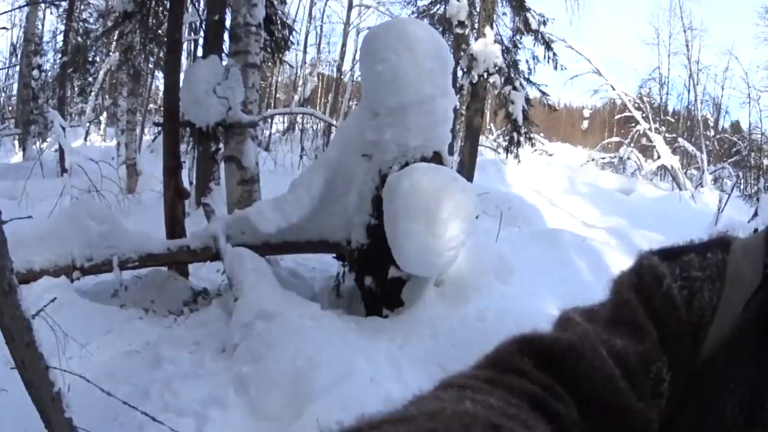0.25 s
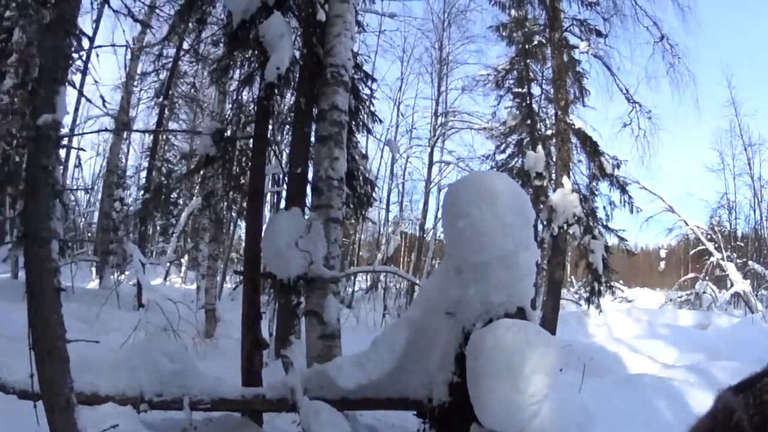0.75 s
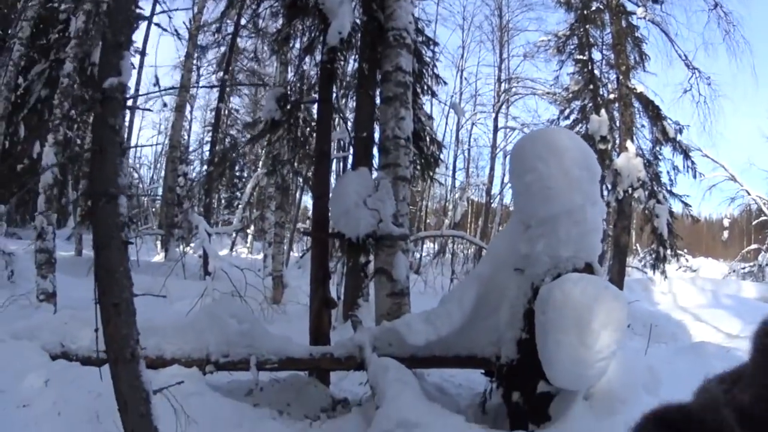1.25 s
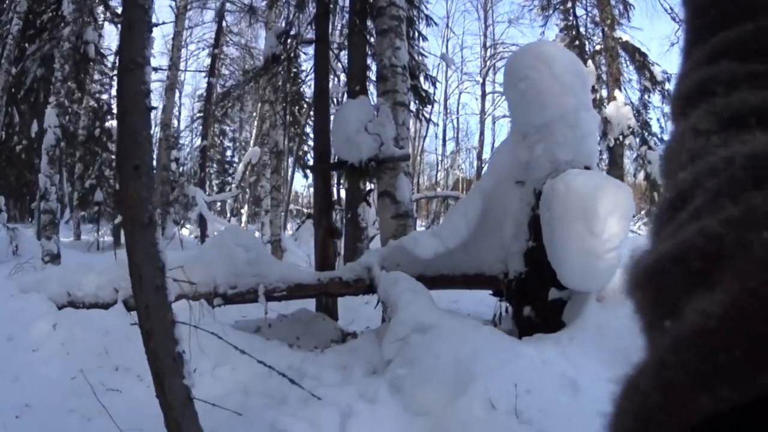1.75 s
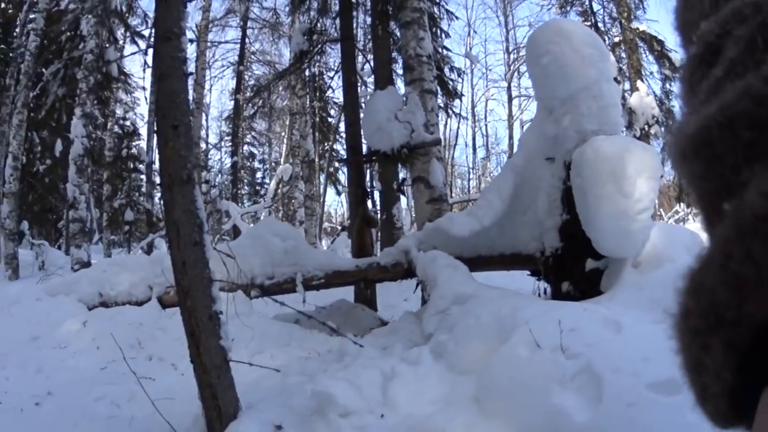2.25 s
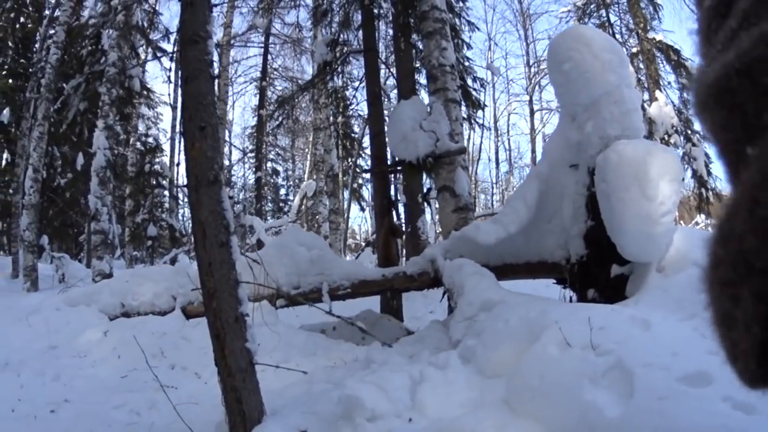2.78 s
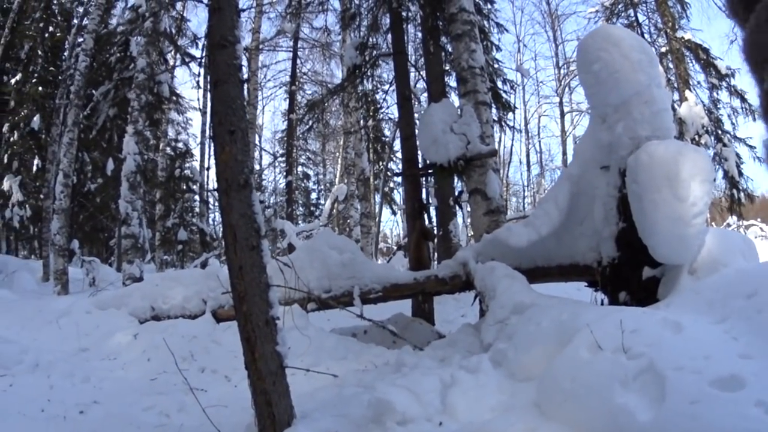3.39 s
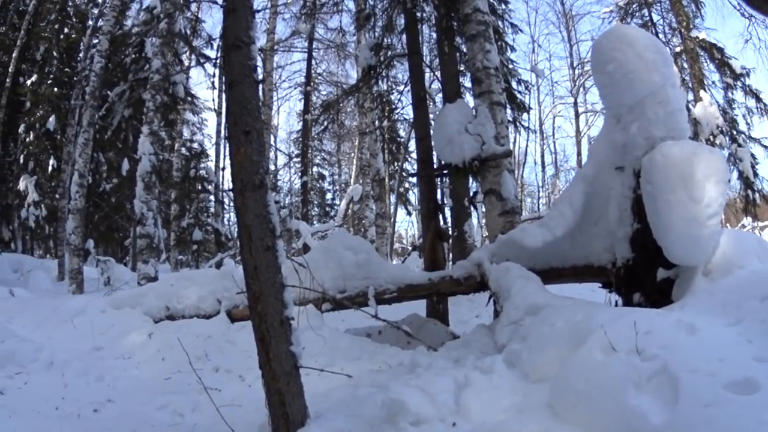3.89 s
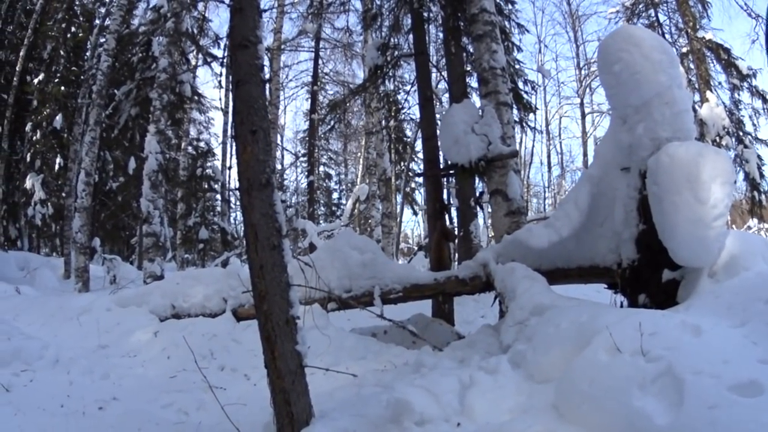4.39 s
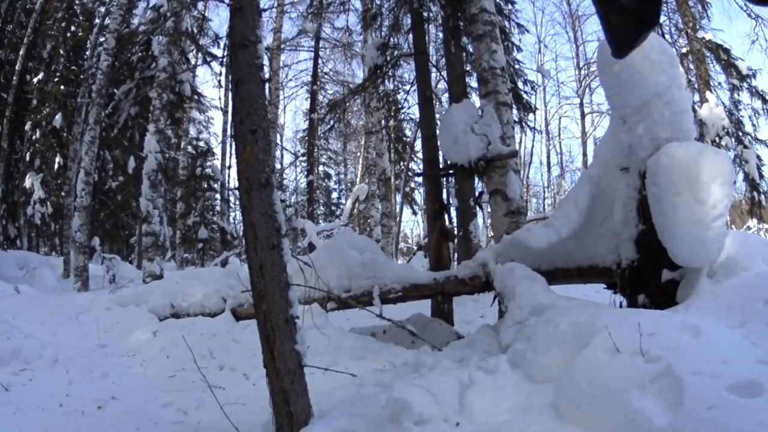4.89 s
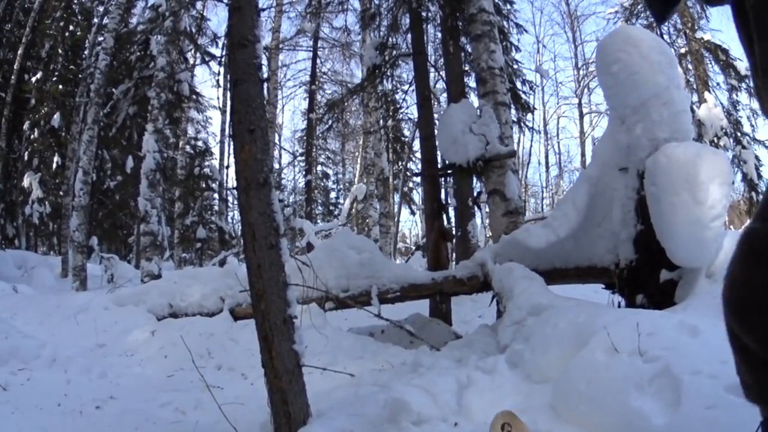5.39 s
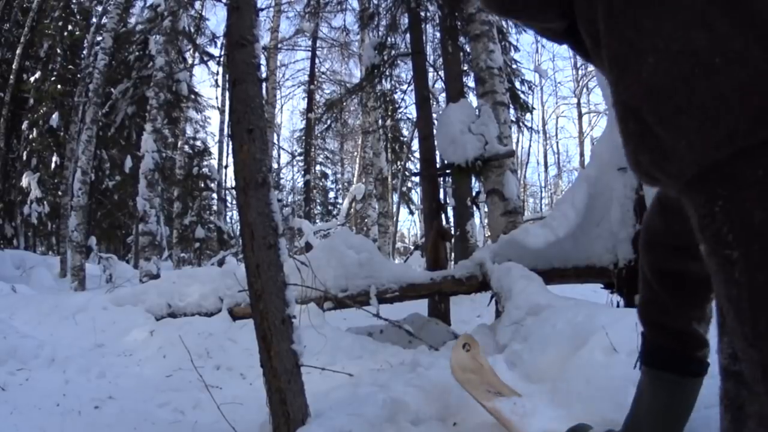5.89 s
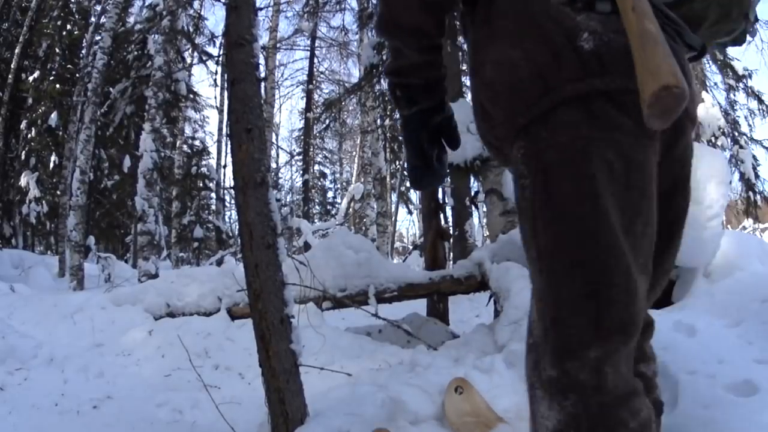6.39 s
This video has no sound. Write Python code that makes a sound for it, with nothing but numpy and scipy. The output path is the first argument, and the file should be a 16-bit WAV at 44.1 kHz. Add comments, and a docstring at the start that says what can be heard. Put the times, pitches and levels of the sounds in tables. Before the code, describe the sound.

Close, dry camera sound in a hushed snowy forest. Thuddy handling knocks come first, followed by faint hollow rubs and thin fibre hiss, fading into near silence. Then a skier shifts weight: a soft swish, accelerating dull creaks, bursts of coarse crunching, hoarse short squeaks, a glide, and a hard step-off with bright cracks and a scrape. The skis start slightly right and finish almost in front.

```python
"""Glove on a camera, skis on frozen snow

A gloved hand sets a small camera down in a still winter forest: filtered slip bursts bump the case, noise strokes rub it.
Close by, a skier shifts his weight and steps off on wide wooden skis. Grain noise shaped by pushes makes the
frozen snow crackle; bursts add creaks, crunches, squeaks and a ringing scrape; smooth noise makes the swishes.
There are no echoes."""
import sys
import numpy as np
from scipy import signal
from scipy.fft import rfft, irfft
from scipy.io import wavfile
from scipy.ndimage import uniform_filter1d

SR = 44100
rng = np.random.default_rng(int(sys.argv[2]) if len(sys.argv) > 2 else 0)


def digitize_waveform(pressure):
    """Quantize a signal to 16-bit integers and store it at the path in sys.argv[1].

    Rows of a 2-D input are taken as channels; values are limited to [-1, 1].
    """
    field = np.atleast_2d(pressure).T
    bounded = np.clip(field, -1, 1)
    quanta = np.round(bounded * 32767).astype(np.int16)
    wavfile.write(sys.argv[1], SR, quanta)


N = 293265
TIME_S = np.arange(N) / SR
FREQS_HZ = np.maximum(np.fft.rfftfreq(N, 1 / SR), 1)

# air and microphone hiss spectrum: f/Hz, level/dB
FOREST_SPECTRUM = [(24, -62), (40, -40.5), (262, -3), (356, -2.5), (640, -2.5), (829, -1), (1130, -3),
                   (2560, -7), (4100, -10), (11000, -14), (14300, -56.5), (22000, -120)]
FOREST_DB = -68.5
# difference of the two microphone ports relative to their sum: f/Hz, level/dB
CASE_SIDE = [(60, -9), (190, 0), (600, 7.5), (1100, 4.5), (2000, 3), (3600, -0.5), (6500, -5), (11000, -8)]
AIR_SIDE = [(60, -2.5), (400, 1.5), (1100, 0), (2200, 5), (3600, -1.5), (5500, -10), (11000, -3)]
SKI_SIDE = [(60, -12), (300, -11), (700, -6.5), (1200, -6), (3600, -13.5), (6500, -16.5), (11000, -12.5)]
# ski position: t/s, left minus right/dB
SKI_PAN = [(3.6, -3), (4.2, -1.6), (4.7, -1.3), (5.2, -0.6), (5.7, -3), (6.3, -0.12)]
TOP_HZ = 11100

# glove bumping and scuffing the case: middle t/s, length/s, level/dB, tilt/(dB per octave)
BUMPS = [(0.039, 0.012, -47.5, 7), (0.067, 0.014, -54, 3), (0.1, 0.047, -53.5, 12), (0.124, .022, -19.5, 3),
         (0.139, 0.0059, -25, -10), (.2, 0.038, -34.5, -3), (0.23, 0.059, -23.5, 0.5),
         (.276, 0.0035, -28, -11), (.322, .03, -56, 10), (0.345, .022, -19.5, 1), (0.36, 0.0089, -30, .5),
         (.414, 0.0062, -43, 6), (0.429, 0.054, -39.5, -13), (0.482, 0.074, -37, -3.5),
         (0.533, 0.044, -52, -7), (0.604, 0.029, -34, -0.5), (0.644, 0.0049, -47.5, -4),
         (0.737, 0.0061, -22, -4), (0.747, .03, -20, 0), (0.852, .011, -31.5, -10),
         (0.863, 0.0044, -30, 18), (0.882, 0.033, -23.5, -3), (0.891, 0.0038, -21, 6.5),
         (1.134, 0.0045, -41, 9), (1.181, 0.017, -45, -2), (1.468, 0.0053, -50, 6), (1.523, .012, -51.5, 9),
         (1.647, .008, -59.5, 4), (1.791, 0.012, -44.5, 4.5), (1.809, 0.0051, -43.5, 4),
         (1.833, 0.013, -47.5, 2), (2.184, 0.012, -47.5, 12.5), (2.457, .017, -49, 2),
         (2.908, 0.039, -54.5, 2), (3.037, 0.0056, -54.5, 6.5), (3.254, 0.016, -49, 3),
         (3.3, 0.0059, -42, 3), (3.653, .006, -46.5, 7)]
# case spectrum under a bump: f/Hz, level/dB
CASE_SPECTRUM = [(18, -38), (30, -14.5), (75, -4.5), (216, -2), (454, -1.5), (709, -2.5), (782, 1.5),
                 (953, -5.5), (1310, -8.5), (2320, -17), (2760, -22), (4990, -32.5), (5650, -34.5),
                 (11000, -49), (14300, -71.5), (22000, -120)]
# glove strokes along the case: start t/s, end t/s, level/dB, swell over stroke/dB, pressure/(0-1), fibre hiss f/Hz
DRAGS = [(0.9, 0.939, -45.5, -15.5, 0.44, 5700), (.944, 0.964, -61.5, -2.5, 0, 7504),
         (1.005, 1.055, -60.5, 5.5, 0.35, 7000), (1.11, 1.19, -62, 1, 0.36, 5627),
         (1.227, 1.304, -65.5, 6, 0.41, 5567), (1.328, 1.471, -62.5, 9.5, .28, 5550),
         (1.496, 1.529, -59, 13.5, 0.24, 5550), (1.61, 1.643, -68, 9, 0.1, 5550),
         (1.69, 1.781, -65, 2, 0.58, 5500), (1.787, 1.996, -60.5, -2, 0.75, 5440),
         (2.014, 2.458, -53, 1.5, 0.77, 5460), (2.512, 2.578, -51, 6, 0.82, 5400),
         (2.662, 2.851, -49, 5, 0.83, 5390), (2.97, 3.046, -72, 7, 0.28, 5387)]
# rubbed case spectrum: f/Hz, level/dB
RUB_SPECTRUM = [(47, -63), (80, -30), (268, -24), (456, -4), (614, -8), (775, 0.5), (1170, -6),
                (1270, -3.5), (1380, -13), (1610, -9), (1800, -15.5), (2640, -9.5), (3390, -27.5),
                (4200, -26.5), (5460, -31), (9240, -120)]
# broad skirt of the fibre hiss: f/Hz, level/dB
FIBRE_SPECTRUM = [(2000, -22.5), (4300, -4.5), (5350, 5.5), (6300, -7.5), (7200, -5), (8200, -14.5),
                  (11000, -23.5)]
DRAG_ATTACK_S, DRAG_RELEASE_S = 0.011, 0.006
# relative to the rasp at (lightest touch, full pressure): pressure wakes the shell, flattens the fibres
HOLLOW_DB, FIBRE_DB = (-10, 7), (11, -12)
WOOL_FLUTTER_DB = 1.5
GRIP_REST_DB, GRIP_RUB_DB = -66.5, -30  # resting level; rub relative to its bump
GRIP_TIGHTEN_S, GRIP_RELAX_S = 0.007, 0.01  # time constants

# skier's swishes: middle t/s, length/s, hiss level/dB, hollow body level/dB
SWISHES = [(3.572, 0.32, -54, -59), (5.514, 0.38, -44.5, -64), (5.647, 0.16, -43.5, -61.5)]
# ski pushes: start t/s, build-up/s, time to ease by 20 dB/s, crust level/dB, weight/(0-1), powder re crust/dB
PUSHES = [(3.672, 0.1, .27, -60, 0.73, -15), (3.89, 0.068, 0.38, -56.5, 0.7, -14),
          (4.03, 0.061, 0.27, -57.5, 0.9, -13), (4.146, .015, 0.08, -43, .8, -8),
          (4.407, 0.066, 0.11, -33.5, 0.78, -12.5), (4.501, 0.1, .12, -38, 0.57, -8),
          (4.795, 0.024, 0.05, -31, 0.66, -3), (4.848, 0.054, 0.07, -41.5, 0.74, -8.5),
          (4.982, 0.14, 0.12, -34, 0.9, -5.5), (5.124, 0.078, 0.0633, -33, 0.85, -6.5),
          (5.278, 0.034, 0.1, -33, 0.74, -0.5), (5.42, 0.24, 0.4232, -48.5, 0.59, -9),
          (5.828, .13, 0.54, -42.5, .45, -8), (5.938, 0.0085, 0.24, -38.5, 0.73, -1),
          (5.981, .06, .5, -39, 0.68, -20), (6.146, 0.079, 0.6, -30.5, 0.52, -8.5),
          (6.279, 0.019, 0.1642, -20.5, .12, 0), (6.337, 0.026, 0.1849, -22.5, 0.31, -5.5),
          (6.43, 0.22, 8, -35.5, 0.36, -3)]
BITE_DB, BITE_S = -14, 0.0029  # onset level relative to the peak; onset ramp
STIR_DB, STIR_S, SETTLE_S = -21.5, 0.015, 0.03  # crumbs around the bite: level re peak, rise and fall time constants
# breaking snow spectrum: f/Hz, level/dB
SNOW_SPECTRUM = [(40, -64), (80, -24.5), (146, -20.5), (250, -15), (309, -10.5), (556, -3.5), (849, -5),
                 (1150, -2), (1270, -2), (2330, -1), (2560, -3.5), (2950, -3.5), (3480, -6.5),
                 (6410, -10.5), (11000, -22.5), (14300, -73), (22000, -120)]
# finer crust shaved by a gliding ski, applied to the snow spectrum: f/Hz, level/dB
GLIDE_SPECTRUM = [(1200, -5), (2000, -4), (3000, 1), (5500, 1.5)]
PACKING_DB = (-19.5, 3.5)  # relative to the crust at (unweighted ski, full weight)
SNOW_LOW_HZ = 55.4  # high-pass
AVALANCHE_SHARE = 0.69  # share of breaking power in avalanches under full weight
LURCH_DB, LURCH_PER_S = 1.3, 70  # uneven sinking: level spread under full weight, rate

# slabs giving way: middle t/s, length/s, level/dB, tilt/(dB per octave)
CRUNCHES = [(4.159, .016, -28.5, -4), (4.181, 0.0086, -31.5, -2.5), (4.194, 0.011, -36, -2.5),
            (4.212, .012, -50, -2), (4.517, .005, -24.5, 1), (4.555, 0.013, -23.5, -0.5),
            (4.595, .008, -28.5, -2), (4.608, .0036, -31, -5), (4.645, 0.0037, -30.5, -1),
            (4.71, 0.0015, -42.5, -3.5), (4.803, .005, -25, 12), (4.814, 0.0044, -25.5, 6.5),
            (4.821, 0.0055, -26, 8.5), (4.863, .004, -34, -3), (4.983, 0.0066, -35.5, -2.5),
            (5.008, 0.0069, -34, -5), (5.031, 0.0025, -23, -4.5), (5.058, 0.0059, -46, 7),
            (5.105, 0.029, -27.5, 0), (5.132, 0.0086, -27, 1), (5.227, 0.016, -25, -1.5),
            (5.311, 0.0018, -18.5, 6), (5.394, 0.011, -37, -5.5), (5.426, 0.0045, -36.5, 2),
            (5.953, 0.015, -28, -6.5), (6.036, 0.016, -30.5, -1), (6.21, 0.0038, -19.5, 0.5),
            (6.281, 0.0035, -23, 4.5), (6.29, 0.0022, -12, 9), (6.298, 0.006, -17.5, 3),
            (6.31, 0.0045, -26, 1), (6.357, 0.0016, -23, 12), (6.362, 0.0019, -29, 0),
            (6.365, 0.0023, -19.5, 0), (6.373, 0.0092, -19.5, .5), (6.378, 0.0024, -26, -0.5),
            (6.4, 0.0027, -24, -1), (6.43, 0.0054, -27.5, -2.5)]
# deep snow giving way in dull steps as weight comes on, each louder than the last: middle t/s
CREAKS_S = [3.905, 3.947, 3.985, 4.016, 4.063, 4.103]
CREAK_LENGTH_S, CREAK_FIRST_DB, CREAK_RISE_DB_PER_S, CREAK_TILT_DB_PER_OCT = 0.008, -47, 55, -8.5
# cold snow squeaking on the ski: middle t/s, length/s, level/dB, pitch f/Hz
SQUEAKS = [(5.259, 0.0031, -23.5, 3160), (5.273, 0.022, -30.5, 2500), (5.29, 0.012, -18.5, 2240),
           (5.304, 0.006, -26.5, 2450), (5.323, 0.037, -29.5, 2350), (5.340, 0.0042, -17, 3800),
           (5.367, 0.012, -29.5, 2360)]
# ski base slipping forward: start t/s, end t/s, slip rate/(1/s), level/dB
JUDDER = (6.168, 6.206, 225, -26)
# push-off scrape: middle t/s, length/s, level/dB
SCRAPE = (6.345, 0.16, -26)
# ski resonances: f/Hz, width/Hz, level/dB
SKI_MODES = [(1957, 70, -4), (2272, 80, -3), (2805, 80, -5), (2917, 70, 0), (3025, 70, -3), (3635, 80, -5),
             (4226, 80, -4), (5410, 90, -7)]


def amp(db):
    """Decibels to gain."""
    return 10 ** (np.asarray(db) / 20)


def gains(points, freqs_hz=FREQS_HZ):
    """Gain at each frequency, interpolated over log frequency."""
    hz, db = np.transpose(points)
    return amp(np.interp(np.log(freqs_hz), np.log(hz), db))


def causal(gain):
    """Same gains with minimum phase: nothing sounds before the blow."""
    cepstrum = irfft(np.log(np.abs(gain) + 1e-7))
    half = len(cepstrum) // 2
    cepstrum[1:half] *= 2
    cepstrum[half + 1:] = 0
    return np.exp(rfft(cepstrum))


def colour(x, gain):
    """Filter by a gain per frequency, scaled to rms 1."""
    y = irfft(rfft(x) * causal(gain), N)
    return y / y.std()


def walk(rate_per_s):
    """Smooth random wander with a spread near 1."""
    hold = max(int(SR / rate_per_s), 1)
    steps = np.repeat(rng.standard_normal(N // hold + 1), hold)
    return 1.4 * uniform_filter1d(steps, hold)[:N]


def grains(rate_per_s, spread_db, size=N):
    """Randomly timed clicks of very unequal strength."""
    hits = rng.random(size) < rate_per_s / SR
    return hits * rng.standard_normal(size) * amp(spread_db * rng.standard_normal(size))


def burst(middle_s, length_s, db, rate_per_s, response, size=8192):
    """A swell of tiny slips through a frequency response; db is the level at its height."""
    t_s = (np.arange(size) - size // 2) / SR
    swell = np.cos(np.pi * np.clip(t_s / length_s, -0.5, 0.5))
    slips = grains(rate_per_s, 2.13, size=size) + 0.05 * rng.standard_normal(size)
    freqs_hz = np.maximum(np.fft.rfftfreq(size, 1 / SR), 1)
    y = irfft(rfft(slips * swell) * causal(response(freqs_hz)))
    y *= amp(db) * np.sqrt(np.sum(swell ** 2) / np.sum(y ** 2))
    out = np.zeros(N + 2 * size)
    start = int(middle_s * SR) + size // 2
    out[start:start + size] = y
    return out[size:-size]


def tilted(tone, tilt_db_per_oct, knee_hz):
    """Spectrum made brighter or duller from a knee up to 6 kHz: harder or softer contact."""
    def response(f_hz):
        octaves = np.log2(np.hypot(1, np.minimum(f_hz, 6000) / knee_hz))
        return tone(f_hz) * amp(tilt_db_per_oct * octaves)
    return response


def between(ends, share):
    """Value between two ends, for a share of 0-1."""
    return ends[0] + (ends[1] - ends[0]) * np.clip(share, 0, 1)


def blend(envelopes, values):
    """One value per event as a curve in time: the loudest event has the most say."""
    power = envelopes ** 2 + 1e-18
    return values @ power / power.sum(axis=0)


def ports(x, side, lead=1, other=None):
    """Two close ports: their difference is a quarter cycle off the sum, or unrelated to it for diffuse sound."""
    source = x if other is None else other
    difference = irfft(rfft(source) * 1j * lead * gains(side), N)
    return np.array([x + difference, x - difference])


def forest():
    """Still air and faint microphone hiss: coloured noise with a slight wander."""
    hiss = colour(rng.standard_normal(N), gains(FOREST_SPECTRUM))
    return hiss * amp(FOREST_DB + 0.2 * walk(5.5))


def bumps():
    """The glove sticks and slips on the case, which shakes the two capsules against each other."""
    def shell(db):
        # only a firm bump moves the whole camera; light taps have no bass
        low_hz = np.interp(db, [-52, -34], [300, 22])
        return lambda f_hz: gains(CASE_SPECTRUM, f_hz) / np.sqrt(1 + (low_hz / f_hz) ** 4)
    return sum(burst(middle_s, length_s, db, 2500, tilted(shell(db), tilt, 550))
               for middle_s, length_s, db, tilt in BUMPS)


def grip():
    """Fingers rub on the case around every bump, and rest on it until the glove starts to slide."""
    def touch(start_s, end_s):
        away = np.maximum((start_s - TIME_S) / GRIP_TIGHTEN_S, (TIME_S - end_s) / GRIP_RELAX_S)
        return np.exp(-np.clip(away, 0, 20))
    rub = sum(amp(db + GRIP_RUB_DB) * touch(middle_s - length_s / 2, middle_s + length_s / 2)
              for middle_s, length_s, db, _ in BUMPS)
    rest = amp(GRIP_REST_DB) * (TIME_S < DRAGS[0][0])
    skin = colour(grains(6000, 4.2), gains([(100, 6), (900, 4), (3000, -10), (6000, -11.5), (11000, -28)]))
    return skin * (rub + rest) * amp(2.64 * walk(40))


def drag(start_s, end_s, db, swell_db):
    """Envelope of a glove stroke: it catches, swells or fades evenly, and lets go."""
    before = np.maximum(start_s - TIME_S, 0) / DRAG_ATTACK_S
    after = np.maximum(TIME_S - end_s, 0) / DRAG_RELEASE_S
    level_db = db + swell_db * np.interp(TIME_S, [start_s, end_s], [-0.5, 0.5])
    return amp(level_db) / np.cosh(np.minimum(before + after, 20))


def fibres(pitch_hz):
    """A narrow band of hiss at a moving pitch, coming in spits, over a broad skirt."""
    width_hz, skirt_db = 420, -2
    band = colour(rng.standard_normal(N), 1 / (1 + (FREQS_HZ / width_hz) ** 2))
    carrier = np.sqrt(2) * np.cos(2 * np.pi * np.cumsum(pitch_hz) / SR)
    spits = amp(3.1 * walk(30) - 4.5)
    skirt = amp(skirt_db) * colour(grains(13000, 1.5), gains(FIBRE_SPECTRUM))
    return band * carrier * spits + skirt


def glove():
    """Wool drags over the case: a hollow rub from the shell, a rasp above it and a thin fibre hiss at the ports."""
    strokes = np.array([drag(*row[:4]) for row in DRAGS])
    pressure, pitch_hz = blend(strokes, np.transpose(DRAGS)[4:])
    low_power = 1 / (1 + (FREQS_HZ / 1400) ** 8)
    rub_gain = gains(RUB_SPECTRUM)
    hollow = colour(grains(14000, 0.55), rub_gain * np.sqrt(low_power)) * amp(between(HOLLOW_DB, pressure))
    rasp = colour(grains(18000, 0.95), rub_gain * np.sqrt(1 - low_power))
    hiss = fibres(pitch_hz) * amp(between(FIBRE_DB, pressure))
    level = np.linalg.norm(strokes, axis=0) * amp(WOOL_FLUTTER_DB * walk(60))
    return level * (hollow + rasp + hiss) + grip()


def swishes():
    """A smooth, airy sweep with a bright edge and a faint hollow body."""
    hiss_points = [(500, -28), (1200, -6), (3300, -6), (4600, 0), (6000, -7), (8000, -11.5), (11000, -30)]
    body_points = [(60, -40), (200, -10.5), (450, -2), (620, -3), (900, -12), (3000, -23)]
    hiss = colour(rng.standard_normal(N), gains(hiss_points))
    body = colour(rng.standard_normal(N), gains(body_points))
    out = np.zeros(N)
    for middle_s, length_s, hiss_db, body_db in SWISHES:
        swell = np.cos(np.pi * np.clip((TIME_S - middle_s) / length_s, -0.5, 0.5)) ** 2.66
        out += swell * (amp(hiss_db) * hiss + amp(body_db) * body)
    return out


def snow_tone(f_hz):
    """Spectrum of breaking snow; such small grains radiate no deep bass."""
    low_hz = 75
    return gains(SNOW_SPECTRUM, f_hz) / np.sqrt(1 + (low_hz / f_hz) ** 8)


def push(start_s, build_s, ease_s, db):
    """Envelope of a push: the snow stirs, the ski bites, the load builds to a peak and eases off."""
    t_s = TIME_S - start_s
    build_db = BITE_DB * (1 - np.clip(t_s / build_s, 0, 1)) ** 2
    ease_db = -20 * np.clip((t_s - build_s) / ease_s, 0, 10)
    stir = amp(STIR_DB) * np.exp(-np.minimum(np.maximum(-t_s / STIR_S, t_s / SETTLE_S), 20))
    return amp(db) * (stir + np.clip(t_s / BITE_S, 0, 1) * amp(build_db + ease_db))


def snow():
    """Ice bonds snap singly, or under weight pack and go in small avalanches; a gliding ski muffles the finest grains."""
    pushes = np.array([push(*row[:4]) for row in PUSHES])
    weight, powder_db = blend(pushes, np.transpose(PUSHES)[4:])
    weight = np.clip(weight, 0, 1)

    # one breaking curve shared by all grain sizes
    fall_s = 0.0037
    avalanches = signal.lfilter([1], [1, -np.exp(-1 / (fall_s * SR))], np.abs(grains(300, 1.8)))
    breaking = np.sqrt(between((1, avalanches / avalanches.mean()), AVALANCHE_SHARE * weight))

    # power shares of the grain sizes
    coarse = 1 / (1 + (FREQS_HZ / 1200) ** 6)
    fine = 1 / (1 + (5500 / FREQS_HZ) ** 8)
    tone = snow_tone(FREQS_HZ)
    packing = colour(grains(4000, 2.8), tone * np.sqrt(coarse)) * amp(between(PACKING_DB, weight))

    shards = grains(10000, 2.4)
    crust_tone = tone * np.sqrt((1 - coarse) * (1 - fine))
    gliding = colour(shards, crust_tone * gains(GLIDE_SPECTRUM))
    loaded = colour(shards, crust_tone)
    crust = between((gliding, loaded), weight)

    dust, muffle_hz = grains(20000, 4.7), 8000
    dust_tone = tone * np.sqrt(fine)
    bare = colour(dust, dust_tone * gains([(5500, -1), (11000, 3.5)]))
    buried = colour(dust, dust_tone / np.sqrt(1 + (FREQS_HZ / muffle_hz) ** 8))
    powder = between((buried, bare), weight) * amp(powder_db)

    lurch = amp(LURCH_DB * weight * walk(LURCH_PER_S))
    crunch = np.linalg.norm(pushes, axis=0) * lurch * breaking * (packing + crust + powder)
    return signal.sosfilt(signal.butter(4, SNOW_LOW_HZ, "high", fs=SR, output="sos"), crunch)


def crunches():
    """Whole slabs collapse in a handful of snaps: deep ones give a dull creak, the crust a bright crack."""
    snaps_per_s = 3200

    def slab(db):
        # a small slab has less bass than a large one
        low_hz = np.interp(db, [-42, -28], [330, 60])
        return lambda f_hz: snow_tone(f_hz) / np.sqrt(1 + (low_hz / f_hz) ** 4)
    creaks = [(t_s, CREAK_LENGTH_S, CREAK_FIRST_DB + CREAK_RISE_DB_PER_S * (t_s - CREAKS_S[0]), CREAK_TILT_DB_PER_OCT)
              for t_s in CREAKS_S]
    return sum(burst(middle_s, length_s, db, snaps_per_s, tilted(slab(db), tilt, 360))
               for middle_s, length_s, db, tilt in creaks + CRUNCHES)


def squeaks():
    """Fast stick-slip on cold crystals: a hoarse tone with its octave, in a bright spray of grains."""
    q, octave_db, spray_db = 10, -8, -13.5
    spray_points = [(100, -32), (500, -5.5), (1400, -2.5), (2300, 4), (6500, 3), (11000, -17.5)]

    def peak(f_hz, centre_hz):
        return 1 / np.hypot(1, q * (f_hz / centre_hz - centre_hz / f_hz))

    def ring(hz):
        def response(f_hz):
            tone = peak(f_hz, hz) + amp(octave_db) * peak(f_hz, 2 * hz)
            return np.hypot(tone, amp(spray_db) * gains(spray_points, f_hz))
        return response
    return sum(burst(middle_s, length_s, db, 6000, ring(hz)) for middle_s, length_s, db, hz in SQUEAKS)


def judder():
    """Before it lets go the ski slips in a quick, nearly even train of ticks."""
    start_s, end_s, rate_per_s, db = JUDDER
    times_s = start_s + np.cumsum(1 + 0.06 * rng.standard_normal(32)) / rate_per_s
    tick_points = [(300, -23.5), (1500, -8.5), (3200, 6), (5000, -7.5), (11000, -20)]
    tick = lambda f_hz: gains(tick_points, f_hz)
    return sum(burst(t_s, 0.001, db, 12000, tick) for t_s in times_s[times_s < end_s])


def scrape():
    """The push-off grinds over the crust and sets the ski ringing: slips through a bank of resonances."""
    middle_s, length_s, db = SCRAPE

    def modes(f_hz):
        power = sum(amp(2 * mode_db) / (1 + (2 * (f_hz - hz) / width_hz) ** 2) ** 2
                    for hz, width_hz, mode_db in SKI_MODES)
        return np.sqrt(power)
    return burst(middle_s, length_s, db, 3000, modes, size=16384)


def scene():
    """Diffuse air all round, contact noise on the case, the skis to one side."""
    air = ports(forest(), AIR_SIDE, other=forest())
    case = ports(bumps(), CASE_SIDE, lead=-1.26) + ports(glove(), AIR_SIDE, other=glove())
    skis = ports(snow() + crunches() + squeaks() + scrape() + judder() + swishes(), SKI_SIDE)
    # grains break along the whole ski, so a little of the sound differs between the ports
    spread_db = -17.5
    spread = amp(spread_db) * snow() * np.array([[1], [-1]])
    # skier starts on the right and ends nearly in front
    pan_db = np.interp(TIME_S, *np.transpose(SKI_PAN))
    pan = amp(np.array([pan_db, -pan_db]) / 2)
    return air + case + (skis + spread) * pan


def record(dry):
    """The camera cuts the top octave steeply: elliptic low-pass."""
    return signal.sosfilt(signal.ellip(10, 0.2, 70, TOP_HZ, fs=SR, output="sos"), dry)


dry = scene()
out = record(dry)
digitize_waveform(out)
```